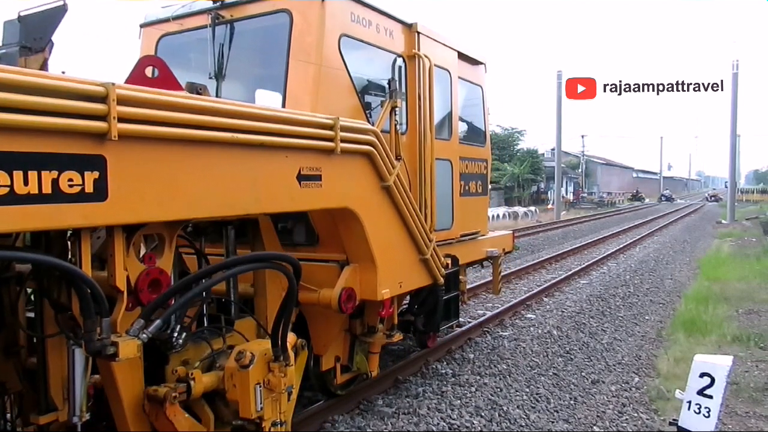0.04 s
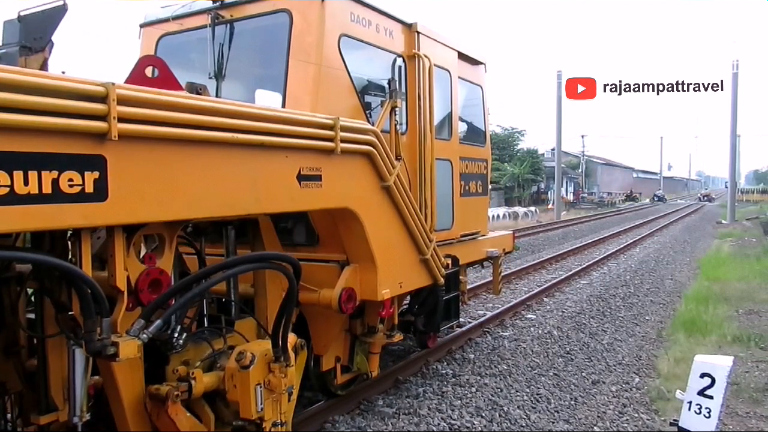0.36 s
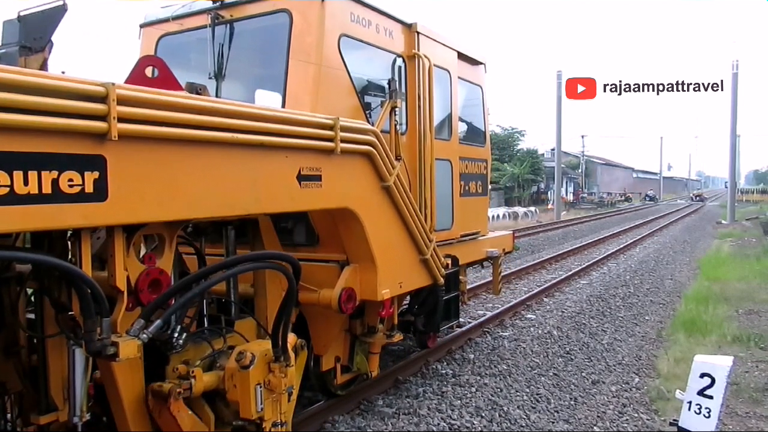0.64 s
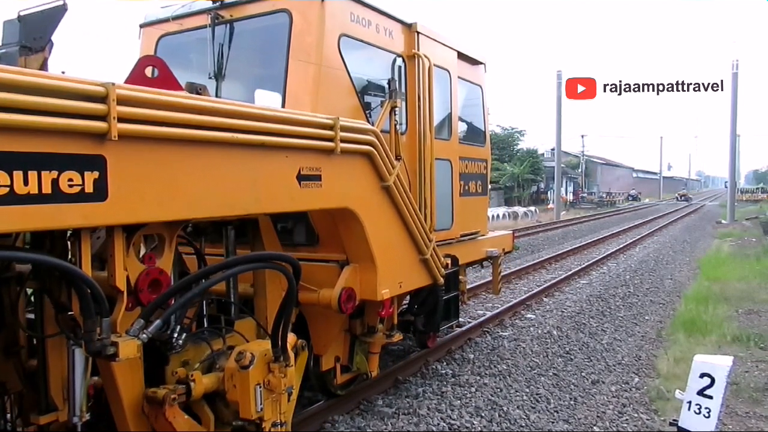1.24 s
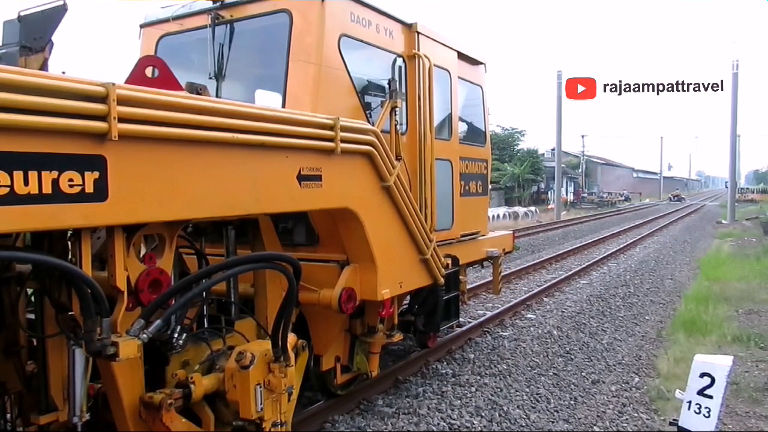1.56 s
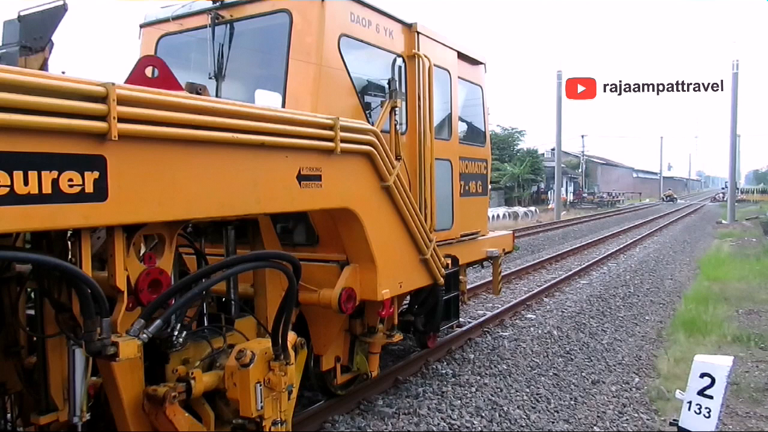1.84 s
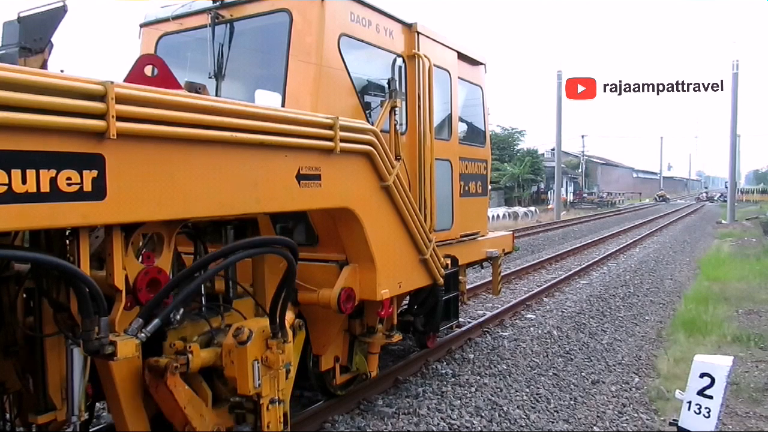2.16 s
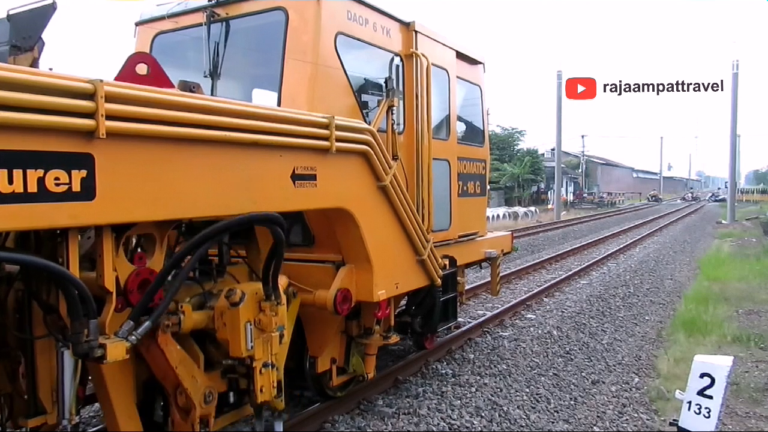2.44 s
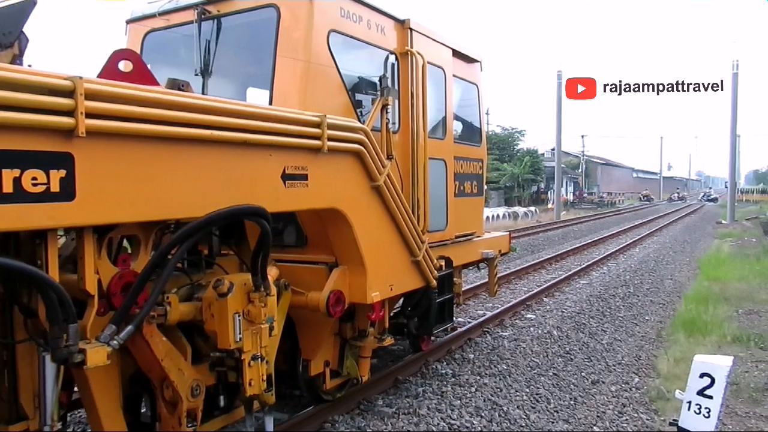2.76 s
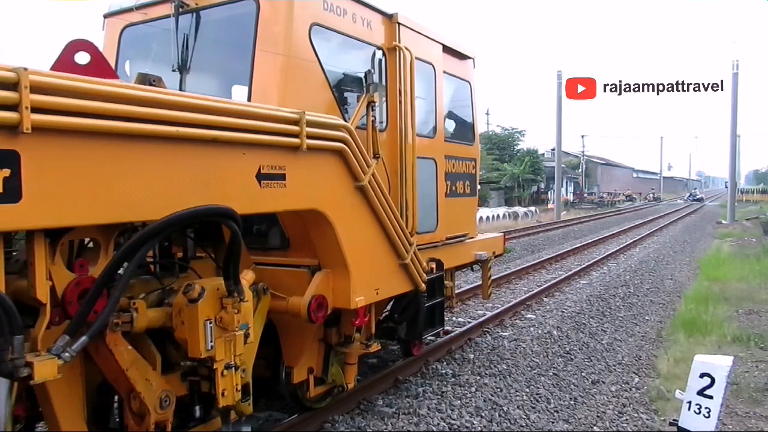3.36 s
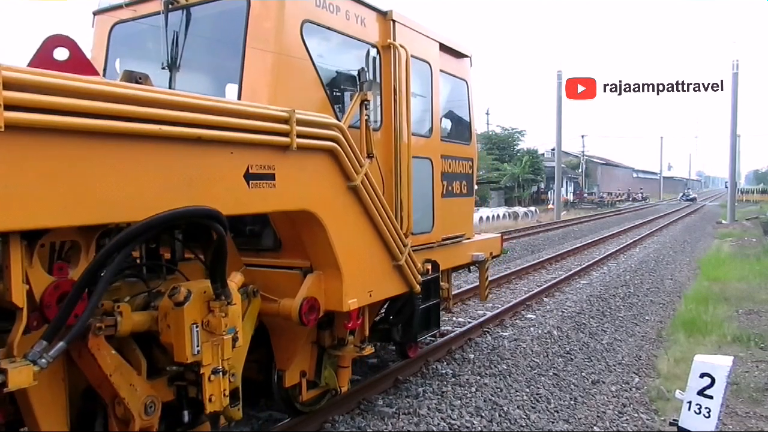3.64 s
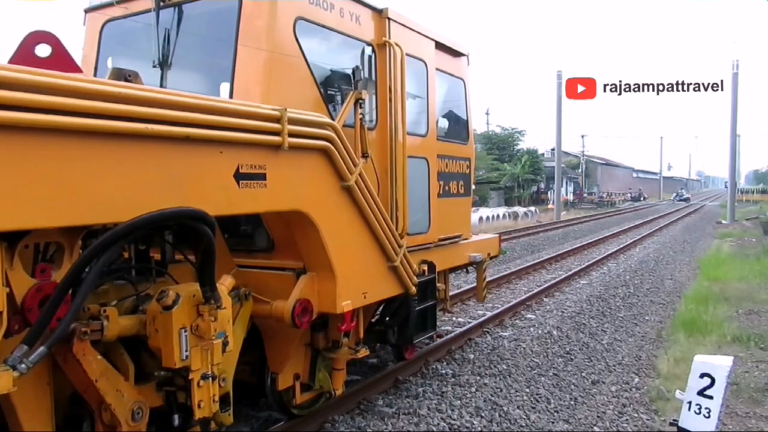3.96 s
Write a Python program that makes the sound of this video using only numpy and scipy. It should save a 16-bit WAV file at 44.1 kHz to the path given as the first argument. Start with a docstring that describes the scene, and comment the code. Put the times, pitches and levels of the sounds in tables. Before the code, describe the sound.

A diesel track tamping machine drones and roars as it creeps along the rails a few metres away, slightly left. A steady hydraulic whine and light knocks run through it, and air hisses briefly just past the middle.

```python
"""A steady diesel drone and roar: a track tamping machine creeps along the rails a few metres away.
Six cylinders firing at high speed give a harmonic exhaust tone, and injector impacts tick.
Fans and running gear make broadband noise; hydraulic pumps whine over a slower, throbbing drive.
Loose parts knock now and then, and rubbing steel chirps and squeaks faintly.
Past the middle a jet of air hisses out, followed later by a much weaker puff."""
import sys
import numpy as np
from scipy import signal
from scipy.fft import rfft, irfft
from scipy.io import wavfile

SR = 44100
rng = np.random.default_rng(int(sys.argv[2]) if len(sys.argv) > 2 else 0)


def unload_audio(sound):
    """Save the sound as a 16-bit wav file, at the path given as the first command line argument."""
    columns = np.transpose(np.atleast_2d(sound))
    # keep every value between -1 and 1, then stretch to whole-number steps
    steps = np.round(np.clip(columns, -1, 1) * 32767)
    wavfile.write(sys.argv[1], SR, steps.astype(np.int16))


N = 176400


def undb(db):
    """Amplitude ratio of a level in decibels."""
    return 10 ** (np.asarray(db) / 20)


def clock():
    """Time of every sample in seconds."""
    return np.arange(N) / SR


def curve(rows, column=1):
    """Linear interpolation of one table column over time."""
    rows = np.array(rows, float)
    return np.interp(clock(), rows[:, 0], rows[:, column])


def bins():
    """Frequency of every spectral bin, at least 1 Hz."""
    return np.maximum(np.arange(N // 2 + 1) * SR / N, 1)


def over_hz(rows):
    """Linear interpolation of a table over log frequency."""
    rows = np.array(rows, float)
    return np.interp(np.log(bins()), np.log(rows[:, 0]), rows[:, 1])


def colour(x, rows):
    """Filtering gives unit white noise a tabulated spectral density, rolling off beyond its ends."""
    ends = np.minimum(bins() / rows[0][0], 1) ** 2 * np.minimum(rows[-1][0] / bins(), 1) ** 4
    return irfft(rfft(x) * undb(over_hz(rows)) * ends * np.sqrt(SR / 2), N)


def walk(rate_hz):
    """Low-passed noise: a smooth random fluctuation of unit variance."""
    drift = irfft(rfft(rng.standard_normal(N)) * np.exp(-(bins() / rate_hz) ** 2), N)
    return (drift - drift.mean()) / drift.std()


def noise():
    """Partly coherent white noise: two channels alike in the bass, more diffuse in the treble."""
    # likeness of left and right: frequency_hz, coherence
    likeness = [(35, .98), (60, .995), (100, .996), (180, .998), (350, .997), (700, .995), (1350, .981),
                (2700, .91), (5300, .7), (9500, .47), (13000, .42)]
    alike = over_hz(likeness)
    mid, side = rfft(rng.standard_normal((2, N)))
    return irfft(mid * np.sqrt((1 + alike) / 2) + np.array([[1], [-1]]) * side * np.sqrt((1 - alike) / 2), N)


def ring(hz, width_hz):
    """A resonance driven by noise, at unit power."""
    band = irfft(rfft(noise()) / (1 + ((bins() - hz) / width_hz * 2) ** 2), N)
    return band / band.std()


def tone(turns):
    """A sinusoid of unit power and random starting phase."""
    return np.sqrt(2) * np.sin(2 * np.pi * (turns + rng.random()))


def glide(hz):
    """A tone of varying pitch: phase is the integral of frequency."""
    return tone(np.cumsum(hz) / SR)


def swell(centre_s, length_s):
    """A Gaussian rise and fall."""
    return np.exp(-2 * ((clock() - centre_s) / length_s) ** 2)


def bursts(strikes, decay_s, attack_s=.003):
    """Convolution gives every strike a quick rise and decay; the envelope has unit power."""
    t = clock()
    envelope = signal.fftconvolve(strikes, np.exp(-t / decay_s) * (1 - np.exp(-t / attack_s)))[:N]
    return envelope / np.sqrt(np.mean(envelope ** 2))


def struck(start_s, decay_s):
    """Envelope of a damped vibration: sudden onset, exponential decay."""
    age = clock() - start_s
    return (age >= 0) * np.exp(-np.abs(age) / decay_s)


def exhaust(turns, cylinders=6):
    """Periodic firing makes a strong tone; unequal cylinders add weaker harmonics of the engine cycle."""
    # strength of the firing tone: time_s, level_db
    drone = [(0, -21), (.27, -18), (.8, -18.3), (1.05, -19.7), (1.8, -18.3), (2.5, -19), (2.9, -18),
             (3.09, -20.5), (3.18, -18.8), (3.75, -18.3), (4, -18.8)]
    # weaker exhaust harmonics: cycle_multiple, level_db
    orders = [(3, -39), (4, -44.5), (8, -50), (9, -37), (11, -43), (12, -38), (15, -40.5), (18, -42),
              (24, -37.5)]
    firing = undb(curve(drone) + .5 * walk(10)) * tone(cylinders * turns)
    return firing + sum(undb(db + 2 * walk(5.2)) * tone(order * turns) for order, db in orders)


def injectors(turns, scatter_db=1.3):
    """Impact excitation: three ticks per engine cycle, one weak, clatter and set metal modes ringing."""
    # ticks in one cycle: cycle_fraction, relative_level_db
    ticks = [(.025, 1), (.36, -6.5), (.692, 3.5)]
    # spectrum of the clatter: frequency_hz, density_db
    spectrum = [(1000, -68), (2000, -80), (3000, -71.5), (3700, -64), (4750, -82), (5400, -67.5),
                (6200, -75.5), (7000, -93), (7700, -81), (8500, -85), (10000, -95), (15000, -108)]
    # modes rung by each tick: pitch_hz, width_hz, level_db
    modes = [(5450, 220, -45.5), (7420, 170, -52)]
    # strength of the ticking: time_s, gain_db
    ticking = [(0, -7), (.3, -2.5), (.8, -8), (1.2, -7.5), (1.7, -1), (2.1, -13), (2.8, -15), (3.4, -10),
               (4, -9)]
    strikes = np.zeros(N)
    for place, db in ticks:
        at = np.searchsorted(turns, np.arange(int(turns[-1]) + 1) + place)
        size = undb(db + scatter_db * rng.standard_normal(len(at)))
        strikes[at[at < N]] += size[at < N]
    clatter = colour(noise() * bursts(strikes, decay_s=.0026), spectrum)
    ringing = bursts(strikes, decay_s=.005) * sum(undb(db) * ring(hz, width) for hz, width, db in modes)
    return (clatter + ringing) * undb(curve(ticking))


def drive(turns):
    """A slower shaft hums unsteadily at multiples of its rotation rate."""
    # partials of the hum: shaft_multiple, level_db
    orders = [(1, -48.5), (1.5, -50), (2, -41.5), (3, -41), (4, -37), (6, -40)]
    return sum(undb(db + 2 * walk(2.7)) * tone(order * turns) for order, db in orders)


def roar(drive_turns, flicker_hz=22):
    """Fans and running gear make broadband noise; the shaft modulates its rush, and panels resonate."""
    # spectrum of the low rumble: frequency_hz, density_db
    rumble_spectrum = [(20, -80), (32, -71), (60, -60), (82, -61), (100, -48), (125, -47), (160, -50),
                       (190, -49), (230, -51), (320, -49), (440, -46.5), (580, -47.5), (850, -49.5),
                       (1150, -59), (1700, -60)]
    # spectrum of the higher rush: frequency_hz, density_db
    rush_spectrum = [(500, -69), (950, -54), (1280, -53.5), (1650, -57.5), (2000, -57.5), (2700, -62),
                     (3150, -63.5), (4300, -68), (4800, -71), (6000, -73.5), (8000, -78.5), (11500, -83),
                     (13500, -90.5), (15000, -105)]
    # strength of the two bands: time_s, rumble_db, rush_db
    levels = [(0, -20, -26), (.17, -22.5, -26.5), (.5, -20.5, -24.5), (.7, -19, -23.5), (.8, -17.5, -24),
              (.88, -20.5, -26.5), (1.19, -22, -25.5), (1.3, -21.5, -24.5), (1.4, -19.5, -25.3),
              (1.5, -21.5, -27), (1.75, -22.5, -25.5), (2.02, -22, -26.5), (2.14, -20.3, -23.5),
              (2.27, -22, -24.5), (2.45, -20.5, -25), (2.66, -22, -27), (2.76, -20, -26), (2.93, -20, -26),
              (3.08, -22, -27.7), (3.35, -19, -25.5), (3.53, -22, -26), (3.66, -19, -24.5),
              (3.85, -20.7, -26.7), (4, -20, -25.5)]
    # strength of the rush above 4500 Hz: time_s, gain_db
    treble_gain = [(0, 3.5), (.3, 3), (.75, 2.5), (.85, 2), (1.3, 3.5), (2, 3), (2.7, 3.5), (3.05, 2.5),
                   (3.45, 0.5), (3.65, 1), (4, 3)]
    # broad resonances of the steel body: pitch_hz, width_hz, level_db
    panel_modes = [(450, 70, -49), (819, 21, -38), (1478, 41, -36.5), (3086, 94, -42), (3360, 44, -46),
                   (4350, 180, -50.5)]
    rumble_db = curve(levels) + 20 + .53 * walk(flicker_hz)
    rumble = colour(noise(), rumble_spectrum) * undb(rumble_db)
    angle = 2 * np.pi * drive_turns
    throb = 1 + .11 * np.cos(angle) + .06 * np.cos(2 * angle)
    grit = undb(.65 * walk(140))
    rush_db = curve(levels, column=2) + 24.5 + .63 * walk(flicker_hz)
    rush = colour(noise(), rush_spectrum) * throb * grit * undb(rush_db)
    treble = irfft(rfft(rush) / (1 + (4500 / bins()) ** 4), N)
    panels = sum(undb(db) * ring(hz, width) for hz, width, db in panel_modes)
    return rumble + rush + treble * (undb(curve(treble_gain)) - 1) + panels


def pumps():
    """Periodic forces in pumps and gears radiate tones that waver in pitch and level."""
    # pump and gear tones: pitch_hz, level_db, wander_hz, waver_db
    partials = [(1037.3, -29.8, 2, 1.1), (1066, -40, 2.2, 3), (2075, -46.5, 3.5, 3), (3113, -51, 6, 3),
                (3370, -54.5, 10, 3.5)]
    # strength of the whine: time_s, gain_db
    whining = [(0, -1), (.6, 0.5), (1.3, 0), (1.85, -3), (2.15, 0), (2.92, -3.5), (3.22, 2.5), (3.62, 1),
               (4, -0.5)]
    whine = sum(undb(db + waver_db * walk(6.7)) * glide(hz + wander_hz * walk(18.8))
                for hz, db, wander_hz, waver_db in partials)
    return whine * undb(curve(whining))


def knocks():
    """Impacts of loose metal fittings give quickly damped broadband bursts."""
    # impacts: start_s, gain_db, decay_s
    hits = [(.58, 2, 0.0091), (0.93, 0, 0.018), (1.278, -1, 0.03), (2.054, 0, 0.0088), (2.135, -6, 0.014),
            (2.55, 3.5, 0.0068), (2.738, 0, 0.0067), (3.384, -1, 0.009), (3.505, 1, .006)]
    # spectrum of a knock: frequency_hz, density_db
    spectrum = [(300, -60), (1200, -55), (3300, -59), (5500, -70), (10000, -78), (15000, -92)]
    envelope = sum(undb(db) * struck(at, decay) for at, db, decay in hits)
    return colour(noise() * envelope, spectrum)


def oil_valve(centre_s=.7, pitch_hz=4255, fall_hz_per_s=1100, wander_hz=36):
    """Oil flowing through a valve excites one brief, falling whine."""
    hz = pitch_hz - fall_hz_per_s * (clock() - centre_s) + wander_hz * walk(120)
    return undb(-37.5) * swell(centre_s, length_s=.2) * glide(hz)


def clunks():
    """Parts of the frame clunk and clack, each in a single resonance of unsteady pitch."""
    # frame resonances: centre_s, length_s, pitch_hz, width_hz, level_db
    events = [(.665, .025, 2000, 200, -28), (.712, .022, 2620, 50, -31), (.792, .036, 440, 100, -21.5),
              (1.26, .028, 825, 50, -25), (2.978, .014, 1630, 330, -23)]
    return sum(undb(db) * swell(at, length) * glide(hz + width / 2 * walk(width))
               for at, length, hz, width, db in events)


def chirps(chatter_start_s=2.45):
    """Friction on steel excites a narrow, high resonance in thin chirps and a faint chatter."""
    # chirps of rubbing steel: centre_s, length_s, level_db
    rubs = [(2.04, .035, -51), (2.16, .03, -51), (2.53, .04, -50), (2.71, .04, -46), (2.89, .04, -48.5),
            (3.11, .05, -48), (3.24, .035, -49.5), (3.34, .03, -51), (3.78, .08, -51)]
    chatter = (clock() > chatter_start_s) * undb(-64 + 4 * walk(20))
    envelope = chatter + sum(undb(db) * swell(at, length) for at, length, db in rubs)
    return ring(9290, width_hz=130) * envelope


def air(attack_s=.071, sag_s=.34, close_s=.08):
    """A turbulent air jet swells, sputters and sags with the pressure until its valve shuts."""
    # valve openings: start_s, open_s, gain_db
    puffs = [(2.17, 0.43, 1.6), (3.54, 0.5, -12)]
    # spectrum of the jet: frequency_hz, density_db
    spectrum = [(1500, -87), (3500, -70), (6000, -73), (8500, -74.5), (12000, -75.5), (15500, -82)]
    envelope = 0
    for at, open_s, db in puffs:
        age = clock() - at
        sag = np.maximum(age - attack_s, 0) / sag_s + np.maximum(age - open_s, 0) / close_s
        envelope = envelope + undb(db) * np.clip(age / attack_s, 0, 1) * np.exp(-sag)
    hiss = colour(rng.standard_normal((2, N)), spectrum)  # incoherent between the two sides
    return hiss * envelope * undb(.9 * walk(60))


def clink():
    """A small steel pin, struck once, vibrates freely in inharmonic modes."""
    # modes of the pin: pitch_hz, level_db
    modes = [(2680, -29), (3650, -31), (3870, -29.5)]
    return struck(start_s=2.428, decay_s=.013) * sum(undb(db) * tone(hz * clock()) for hz, db in modes)


def squeaks(roughness=.018):
    """Friction-driven vibration: steel sliding on steel sings for an instant over a dry scrape."""
    # squeaks: centre_s, length_s, pitch_hz, level_db
    slips = [(2.955, .018, 4870, -30.5), (3.087, .02, 4770, -37)]
    # inharmonic partials of a squeak: pitch_ratio, relative_level_db
    partials = [(1, 0), (1.58, -12), (2.55, -17)]
    # spectrum of the scrape: frequency_hz, relative_density_db
    spectrum = [(4000, -39), (8000, -35), (11500, -37), (15000, -52)]
    scrape = undb(-10) * colour(noise(), spectrum)
    sound = 0
    for at, length, hz, db in slips:
        turns = np.cumsum(hz * (1 + roughness * walk(380))) / SR
        sung = sum(undb(part_db) * tone(ratio * turns) for ratio, part_db in partials)
        sound = sound + undb(db) * swell(at, length) * (sung + scrape)
    return sound


def place_left(x, lag_s=3e-5):
    """Interaural time and level cues: the machine is a little to the left, so sooner and louder there."""
    # level of the left side over the right: frequency_hz, level_db
    lean = [(170, 0), (350, .2), (700, .8), (1400, 1.4), (2800, 1.9), (5400, 1.6), (9500, .6), (13000, -.4)]
    sides = np.array([[.5], [-.5]])
    phase_shift = np.exp(2j * np.pi * bins() * lag_s * sides)
    return irfft(rfft(x) * undb(sides * over_hz(lean)) * phase_shift, N)


def scene(cycle_hz=17.878, drive_hz=32.24):
    """Superposition of all sources; engine and drive shaft each keep their own rate."""
    # engine speed: time_s, speed_ratio
    speed = [(0, 1.002), (.8, 1.001), (1.8, .9993), (3, 1.0), (4, 1.001)]
    # strength of the bass below 75 Hz: time_s, gain_db
    bass_gain = [(0, 1), (1.7, 1.5), (2.3, -1), (3.3, 0), (4, -5)]
    turns = np.cumsum(cycle_hz * curve(speed)) / SR
    drive_turns = np.cumsum(drive_hz * (1 + .011 * walk(2.8))) / SR
    machine = exhaust(turns) + injectors(turns) + drive(drive_turns) + roar(drive_turns) + pumps()
    machine += knocks() + oil_valve() + clunks() + chirps() + air() + clink() + squeaks()
    bass = irfft(rfft(machine) / (1 + (bins() / 75) ** 12), N)
    machine += bass * (undb(curve(bass_gain)) - 1)
    t = clock()
    fade = np.minimum(np.minimum(t, t[::-1]) / .004, 1)
    return place_left(machine * fade)


def record(dry, cutoff_hz=15200):
    """A steep low-pass filter removes the highest treble."""
    return signal.sosfilt(signal.ellip(10, .1, 80, cutoff_hz, fs=SR, output="sos"), dry)


dry = scene()
out = record(dry)
unload_audio(out)
```